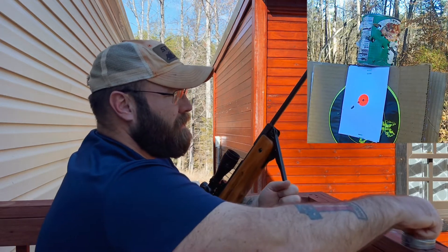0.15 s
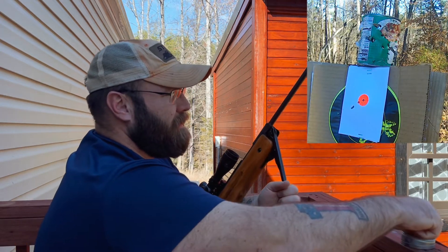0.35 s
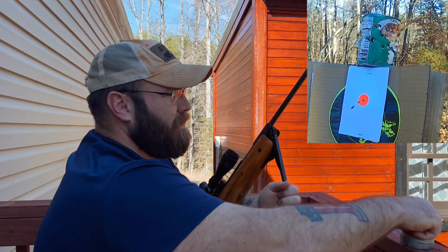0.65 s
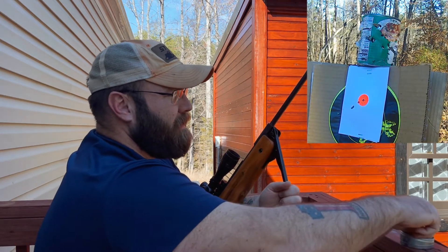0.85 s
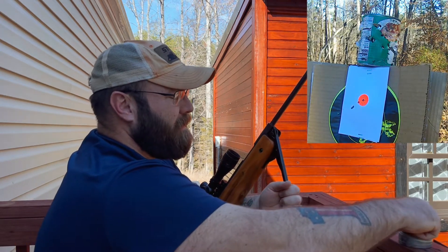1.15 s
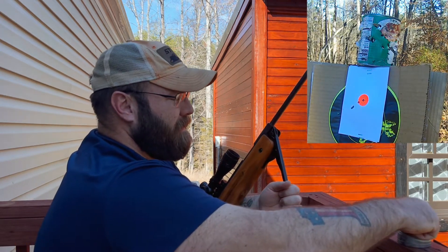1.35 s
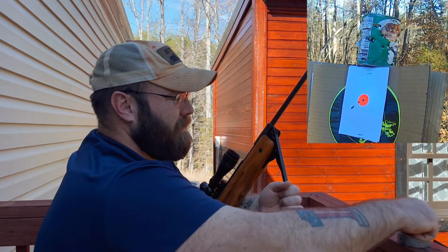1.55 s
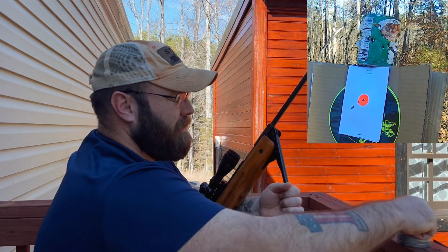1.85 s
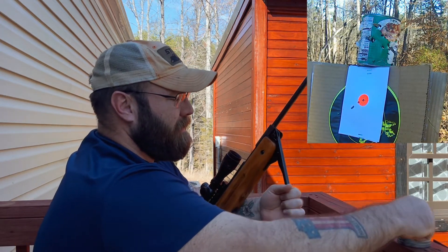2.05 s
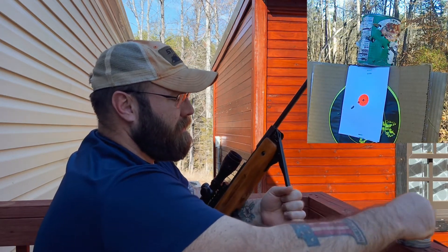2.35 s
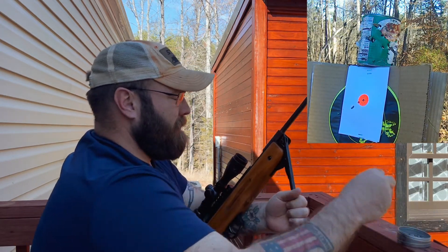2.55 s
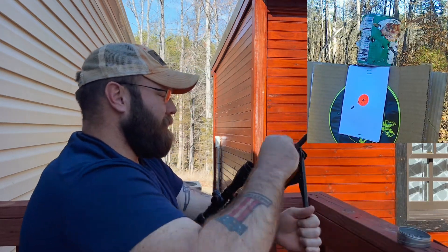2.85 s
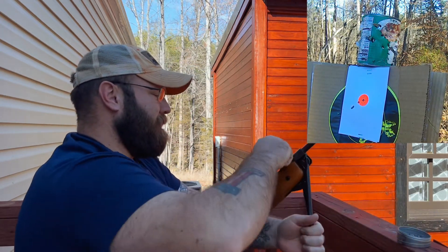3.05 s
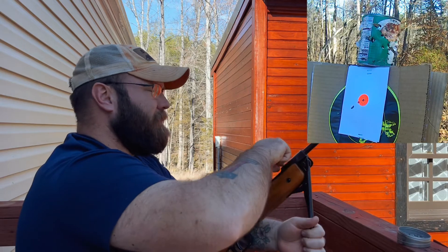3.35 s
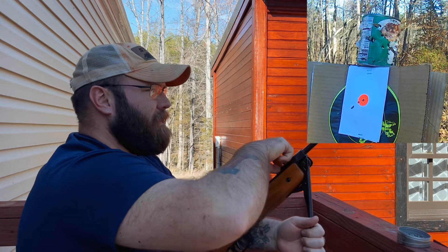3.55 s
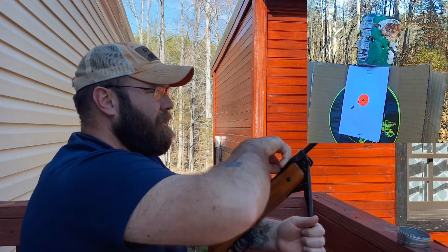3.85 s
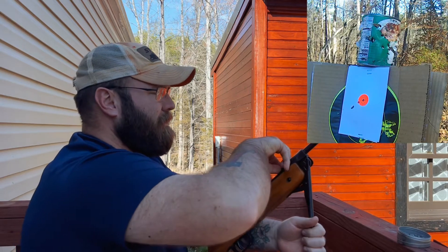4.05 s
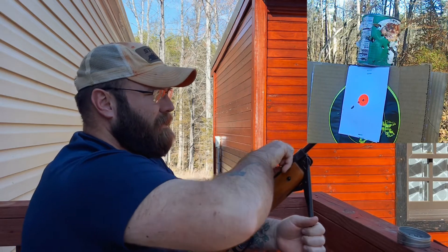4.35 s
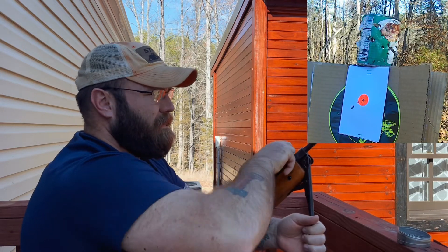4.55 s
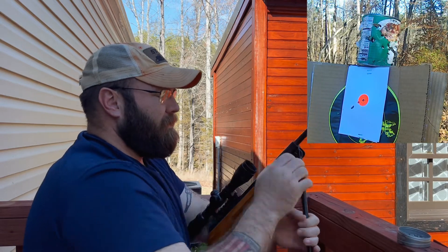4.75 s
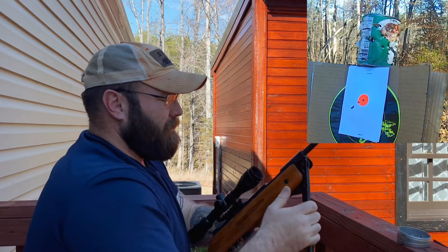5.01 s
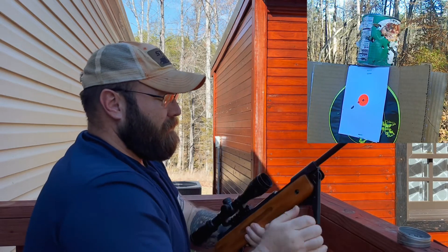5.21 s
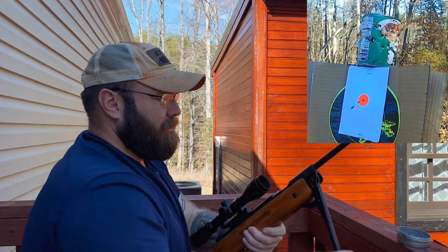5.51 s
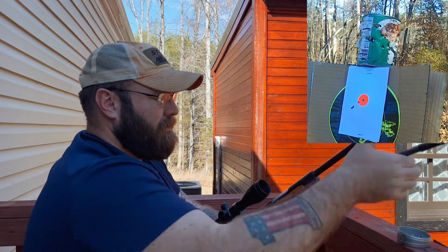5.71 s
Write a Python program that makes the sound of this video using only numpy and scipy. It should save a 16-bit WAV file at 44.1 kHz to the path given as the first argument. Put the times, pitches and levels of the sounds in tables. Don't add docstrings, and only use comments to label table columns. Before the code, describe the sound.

On an outdoor porch, heard from about an arm's length, fingers stir lead pellets in a thin metal tin with small bright knocks and slides. One is picked out and the tin clacks on the wooden rail. A near-silent stretch follows, with faint cloth brushing, then an air rifle's lever rubs, clicks quickly and latches loudly. Soft distant traffic and air in trees continue throughout.

```python
import sys
import numpy as np
from scipy import signal
from scipy.fft import rfft, irfft, next_fast_len
from scipy.io import wavfile
from scipy.ndimage import map_coordinates

SR = 44100
rng = np.random.default_rng(int(sys.argv[2]) if len(sys.argv) > 2 else 0)


def how_loud(loudness_db):
    steps = np.asarray(loudness_db, float) / 20
    return 10 ** steps


def unload_wav(signal):
    wavfile.write(
        sys.argv[1],
        SR,
        np.round(np.clip(np.atleast_2d(signal).T, -1, 1) * 32767).astype(np.int16),
    )


N = 259175


def unit(x):
    return x / np.sqrt(np.mean(x ** 2) + 1e-20)


def along(points, hz):
    f, v = np.transpose(points)
    return np.interp(np.log(hz + 1), np.log(f + 1), v)


def curves(rows):
    s, *columns = np.transpose(rows)
    t = np.arange(N) / SR
    return [np.interp(t, s, column, left=-120, right=-120) for column in columns]


def wobble(rate):
    knots = rng.standard_normal(int(N * rate / SR) + 4)
    return map_coordinates(knots, [np.arange(N) * rate / SR])


def filtered(x, response):
    m = next_fast_len(x.shape[-1] + 8192)
    spectrum = rfft(x, m) * response(np.fft.rfftfreq(m, 1 / SR))
    return irfft(spectrum, m)[..., :x.shape[-1]]


def resonance(part, f, scatter_db=0):
    luck = how_loud(scatter_db * rng.standard_normal(len(part)))
    modes = 0
    for k, (hz, width, db) in enumerate(part):
        mode = 1j * f * width / (hz * hz - f * f + 1j * f * width)
        modes = modes + (-1) ** k * luck[k] * how_loud(db) * mode
    lowest_hz, highest_hz = part[0][0], part[-1][0]
    low_cut = (1j * f / (1j * f + 0.56 * lowest_hz)) ** 2
    return modes * low_cut / (1 + 1j * f / (1.05 * highest_hz)) ** 2


def gritty(rate, spread_db):
    happens = rng.random(N) < rate / SR
    return happens * rng.standard_normal(N) * how_loud(spread_db * rng.exponential(size=N))


def bounced(table, middle_db, loss_db, t60):
    reach_db = 26
    first_s, delay_grows = .004, 2.3
    crisper_db, stray = 2.5, .45
    rows = []
    for s, db, place, crack_db in table:
        luck = rng.standard_normal((3, 2))
        rows.append(None)
        rows.pop()
        for k in range(3):
            at, late_s = place, 0
            if k > 0:
                at = place + stray * luck[k, 0]
                late_s = first_s * delay_grows ** (k - 1) * how_loud(1.2 * luck[k, 1])
            level = db - loss_db * k
            low_end = level - reach_db * max(at, 0)
            middle = level + middle_db - reach_db * abs(at) / 2
            high_end = level - reach_db * max(-at, 0)
            crack = level + crack_db + crisper_db * k
            rows.append((s + late_s, low_end, middle, high_end, crack, t60))
    return rows


def contacts(table, body, blow, damping, scatter_db, trim_db, edge_hz):
    span = 4096
    t, f = np.arange(span) / SR, np.fft.rfftfreq(span, 1 / SR)
    out = np.zeros(N + span)
    for s, *levels, t60 in table:
        force = rng.standard_normal(span) * how_loud(-60 * damping * t / max(t60, .002))
        force[:3] = blow * np.array([.5, 1, .5])
        bright_hz = edge_hz * how_loud(.5 * (max(levels) + 38.5))
        push = rfft(force) / (1 + 1j * f / bright_hz)
        hit = 0
        for db, part in zip(levels, body):
            ring = irfft(push * resonance(part, f, scatter_db))[:span * 7 // 8]
            hit = hit + how_loud(db + trim_db) * ring / np.std(ring[:SR // 250])
        out[round(s * SR):][:len(hit)] += hit
    return out[:N]


def rubbing(level_db, body, rate, spread_db):
    whole = [mode for part in body for mode in part]
    slips = filtered(gritty(rate, spread_db), lambda f: resonance(whole, f))
    return how_loud(level_db) * unit(slips)


# start_s, level_db, place (-1 base to 1 rim), crack_over_ring_db
STIR = [(.0761, -57, -0.14, -6), (.1592, -44.5, 0.61, -13), (.1858, -49, .7, -7), (.2017, -41, .4, -16),
        (.2068, -38.5, 0.38, -8.5), (.2454, -27, 0.92, -13), (.2503, -33, .7, -14), (.2637, -43, .55, -5),
        (.2829, -49, .48, 3), (.2896, -34, 0.79, -8), (.2936, -42.5, -.45, -1), (.4185, -44.5, 0.33, -7),
        (.4223, -37, .7, -11.5), (.4903, -47.5, .03, -5), (.4941, -34, -0.036, 0), (.5086, -42, 0.2, -4),
        (.6165, -51, .05, -13), (.6298, -41.5, 0.38, 0), (.6339, -45, -0.68, -1), (.6744, -47.5, .7, -21),
        (.6869, -51, .48, 0), (.7522, -51, .8, -7), (.7667, -52.5, .4, -1.5), (.7819, -48.5, 0.53, -12),
        (.9674, -52, 0.69, -2), (.9966, -47.5, .7, -14), (1.0045, -41.5, .4, -7), (1.0422, -55.5, .2, 1)]
# start_s, level_db, place (-1 base to 1 rim), crack_over_ring_db
DIG = [(1.146, -54, -.1, -8), (1.166, -41, -0.44, -3.5), (1.1785, -40, -0.88, -8), (1.1998, -45, -.03, -.4),
       (1.2093, -37.5, 0.14, -6.5), (1.22, -49, -.45, 3), (1.2575, -48, .3, -3),
       (1.2716, -37.5, 0.086, -1.5), (1.2897, -42.5, 0.65, -19), (1.3103, -47, 0.17, -8),
       (1.3345, -41.5, -.1, -5), (1.3427, -41.5, .03, -4), (1.3605, -47, 0.52, -13),
       (1.3853, -37, -0.0076, -3), (1.401, -42, -0.83, -6), (1.4469, -49.5, .4, 3.5),
       (1.4538, -51.5, 0.37, 2.5), (1.486, -50, .7, -14), (1.505, -56, .4, -3), (1.5427, -41, .9, -21),
       (1.549, -50, -0.2, 1), (1.5529, -41.5, .7, -9), (1.598, -48.5, .25, -3), (1.6549, -39.5, 1, -27),
       (1.6762, -49, 0.1, -6), (1.6813, -40, .7, -21), (1.6896, -46, 0.071, -1.5), (1.6977, -49, 0.4, -10),
       (1.742, -46.5, -0.26, -9), (2.0513, -48, 0.36, -6)]
# time_s, level_db
SHUFFLE = [
    [(.02, -60), (.15, -69), (.33, -60), (.45, -71), (.68, -71), (.85, -66)],
    [(.9, -62), (1.05, -65), (1.12, -65), (1.45, -67), (1.7, -59.5), (1.8, -70)],
]
# pitch_hz, width_hz, level_db
TIN = [
    [(1473, 230, -3), (1690, 84, 0), (1878, 60, 5), (2500, 48, -2.5)],
    [(2600, 83, -15), (2860, 69, 7)],
    [(3160, 120, 2), (3546, 285, 6), (4060, 90, -9), (4220, 140, -7.5)],
    [(5100, 720, -4.5), (5480, 190, 4), (6250, 1900, -9), (7770, 640, -5), (8870, 1800, -12),
     (14040, 6800, -16.5)],
]


def pellets():
    stirred = bounced(STIR, middle_db=-1.5, loss_db=12.5, t60=0.034)
    dug = bounced(DIG, middle_db=-1.5, loss_db=10.5, t60=0.019)
    knocks = contacts(stirred + dug, TIN, edge_hz=33000, blow=5.2, damping=0.81,
                      scatter_db=3.0, trim_db=-0.9)
    shuffle_db = np.max([curves(rows)[0] for rows in SHUFFLE], axis=0)
    return knocks + rubbing(shuffle_db, TIN[1:], rate=1700, spread_db=2.5)


# start_s, level_db, place (-1 rail to 1 wall), crack_over_ring_db
PICK = [(.4945, -41.5, -1.5, -29), (1.1665, -56, -3.5, -15), (1.385, -47, -1.5, -23), (2.2244, -52, 0, -13),
        (2.2293, -39.5, -0.3, -9), (2.2304, -31.5, .7, -7), (2.2485, -50, 0.5, -7), (2.2719, -42.5, 0, -5),
        (2.2964, -45.5, 1.5, -11), (2.2993, -46, 0.05, -.4), (2.3091, -49, .6, -7)]
# pitch_hz, width_hz, level_db
TIN_ON_RAIL = [
    [(870, 90, 1.5), (1090, 150, -2.5)],
    [(2010, 450, 3), (2360, 170, -4), (2590, 130, -2.5)],
    [(3230, 250, -8), (4030, 790, 0), (4550, 190, -8)],
    [(5800, 370, 0), (7450, 630, -7), (8550, 760, -4), (11900, 7300, -9)],
]


def rocking_tin():
    knocks = bounced(PICK, middle_db=11, loss_db=11, t60=0.019)
    return contacts(knocks, TIN_ON_RAIL, edge_hz=20000, blow=6.6, damping=0.64, scatter_db=3.5, trim_db=-1.0)


# start_s, level_db, place (-1 stock to 1 linkage), crack_over_ring_db
LEVER = [(5.3956, -34, 0.41, -1), (5.3975, -34.5, 0.31, -10), (5.416, -27, 0.42, -7.5),
         (5.4293, -44, -.48, -14), (5.4483, -49, -.4, -25), (5.4696, -51.5, 0.0058, -9),
         (5.5134, -54.5, .03, -7), (5.5272, -50, .2, -3), (5.5335, -53, 0.26, -4), (5.573, -31.5, .4, -13),
         (5.5839, -39.5, 0.25, -10), (5.5947, -40, 0.16, -4), (5.6075, -44, -0.27, -6),
         (5.6166, -23.5, 0.67, -13), (5.6267, -30, 0.35, -13), (5.6508, -41.5, .7, -14),
         (5.6567, -44, .8, -16), (5.6875, -37.5, 0.33, -11), (5.6909, -35, 0.1, 4),
         (5.6956, -33.5, 0.14, -13), (5.7209, -45, -.55, -18), (5.731, -24.5, 0.37, -0.8),
         (5.7469, -26, .48, -19), (5.7511, -14, 0.57, -0.5), (5.7528, -21, .35, -4),
         (5.7565, -19.5, .3, -12), (5.7604, -27, 0.2, -14), (5.7941, -38.5, 0.68, -7)]
# start_s, level_db, place (-1 stock to 1 linkage),
# crack_over_ring_db
SNAP = [
    (5.5618, -39, .4, -19),
    (5.7446, -21.5, .9, 2),
    (5.7512, -16, .9, 6),
]
# time_s, level_db
SLIDE = [
    (5.39, -70),
    (5.44, -60),
    (5.49, -57),
    (5.55, -51),
    (5.61, -43.5),
    (5.66, -54),
    (5.73, -55),
    (5.75, -81),
]
# pitch_hz, width_hz, level_db
RIFLE = [
    [(470, 320, -10.5), (1038, 150, -4), (1300, 127, -4), (1526, 180, -4)],
    [(1790, 200, -8.5), (1970, 230, -5.5), (2400, 300, 1.5), (2716, 170, 1.5)],
    [(3090, 190, 4), (3430, 240, -0.5), (3850, 260, -2), (4570, 440, -5.5)],
    [(5620, 470, 1), (6260, 200, -2), (7140, 560, -3), (7600, 440, -0.5), (10100, 5500, -2),
     (13900, 6700, -9)],
]


def lever():
    clicks = bounced(LEVER, middle_db=3.0, loss_db=11.5, t60=0.031)
    snaps = bounced(SNAP, middle_db=-2.5, loss_db=26, t60=0.0098)
    steel = contacts(clicks + snaps, RIFLE, edge_hz=3200, blow=3.0, damping=1.42,
                     scatter_db=3.0, trim_db=1.0)
    return steel + rubbing(curves(SLIDE)[0], RIFLE[:3], rate=6600, spread_db=0.0)


# pitch_hz, level_db, t60_s
STOCK = [(45, -46, .35), (130, -42, .1), (240, -35, .08), (318, -30, .13), (385, -23, .04),
         (441, -24, .145), (830, -22, .04), (975, -17, .048), (1254, -29, .09), (3320, -47, .4),
         (3385, -51, .3)]


def stock():
    latch_s, rise_s = 5.7515, 0.0032
    t = np.clip(np.arange(N) / SR - latch_s, 0, None)
    ring = sum(how_loud(db - 60 * t / t60) * np.sin(2 * np.pi * hz * t) for hz, db, t60 in STOCK)
    return ring * (1 - np.exp(-t / rise_s))


# middle_s, length_s, level_db, pressure (share of the fuller drag)
SLEEVE = [
    (4.57, .05, -73, .3),
    (4.824, 0.1, -66.5, .3),
    (4.919, 0.074, -63.5, .1),
    (5.056, 0.075, -63, 1.4),
    (5.16, .05, -80, .2),
]
# pitch_hz, level_db (per Hz)
CLOTH = [(2000, -120), (4000, -4), (6500, -5), (9000, -4), (13000, -7), (16000, -9), (17000, -120)]


def sleeve():
    t = np.arange(N) / SR
    hiss = unit(filtered(gritty(7800, 1.1), lambda f: how_loud(along(CLOTH, f))))
    drag = unit(filtered(rng.standard_normal(N), lambda f: resonance([(4000, 3500, 0)], f)))
    out = np.zeros(N)
    for s, length, db, pressure in SLEEVE:
        stroke = np.exp(-(2 * (t - s) / length) ** 4)
        out += how_loud(db) * stroke * (hiss + pressure * drag)
    return out


# pitch_hz, t60_s
PORCH = [(500, 0.1), (3000, 0.1), (12000, 0.077)]


def porch(x):
    block, delay = 2048, 150
    noise = rng.standard_normal((N // block + 1, SR // 8))
    hz, t, z = signal.stft(noise, SR, nperseg=256)
    decay = how_loud(-60 * t / along(PORCH, hz)[:, None])
    tails = signal.istft(z * decay, SR, nperseg=256)[1]
    out = np.zeros(N + SR)
    for k, tail in enumerate(tails):
        answer = signal.fftconvolve(x[k * block:][:block], tail / np.linalg.norm(tail))
        out[k * block + delay:][:len(answer)] += answer
    return out[:N]


# pitch_hz, level_db (per Hz)
AIR = [(15, -21), (30, -5.5), (52, -4), (85, -12.5), (121, -7.5), (230, -12), (490, -12.5), (890, -13.5),
       (1690, -23.5), (3900, -24.5), (6000, -29.5), (9000, -39.5), (15500, -48), (16600, -67)]
# time_s, level_db
BREEZE = [
    (0, 0.5),
    (1.5, 1.5),
    (3, 0.6),
    (3.6, -0.2),
    (4.6, -.5),
    (5.88, 2),
]


def air():
    hush = unit(filtered(rng.standard_normal(N), lambda f: how_loud(along(AIR, f))))
    bass = filtered(hush, lambda f: 1 / (1 + (f / 45) ** 6))
    lumps = how_loud(2.5 * wobble(4) - 2) - 1
    level_db = -53.5 + curves(BREEZE)[0] + .3 * wobble(5)
    return how_loud(level_db) * (hush + bass * lumps)


def scene():
    near = pellets() + rocking_tin() + lever() + stock()
    return (near + how_loud(-12.5) * porch(near) + sleeve() + air())[None]


def band_limit(x):
    return signal.sosfilt(signal.butter(12, 16970, fs=SR, output="sos"), x)


def record(dry):
    hold = 1 / (.07 * SR)
    held = signal.lfilter([hold], [1, hold - 1], dry ** 2)
    ducked = dry * how_loud(-2 * held / (held + .0006))
    rounded = ducked / (1 + np.abs(ducked / .95) ** 6) ** (1 / 6)
    top_hz = 16500
    mix = filtered(rounded, lambda f: 1 / (1 + (f / top_hz) ** 60))
    return band_limit(mix)


dry = scene()
out = record(dry)
unload_wav(out)
```